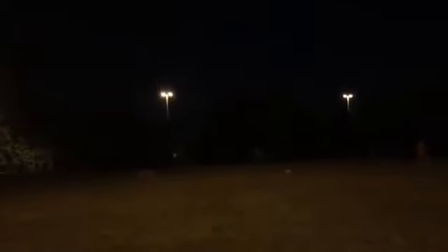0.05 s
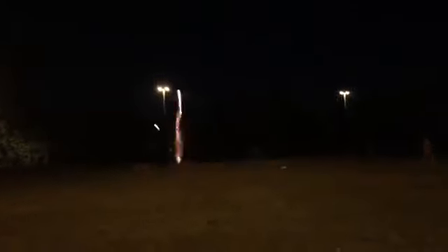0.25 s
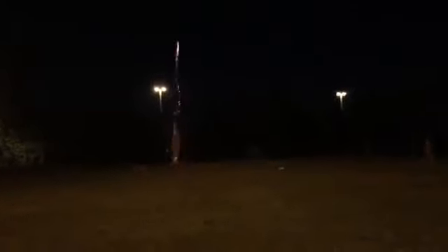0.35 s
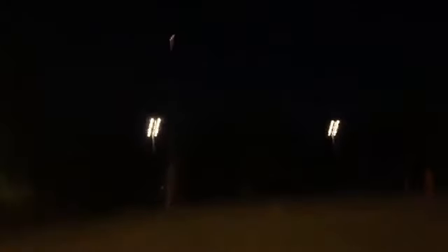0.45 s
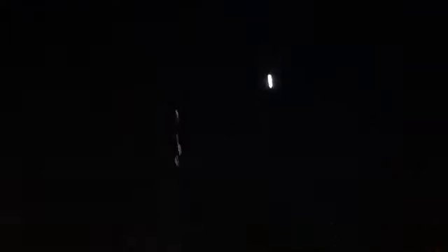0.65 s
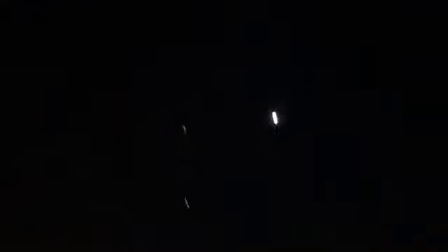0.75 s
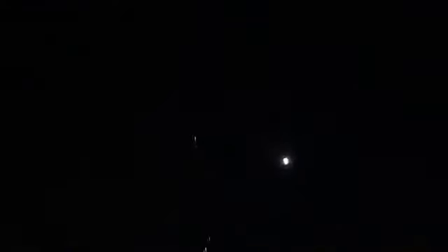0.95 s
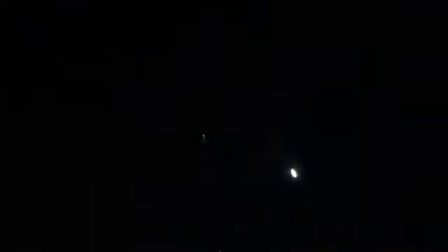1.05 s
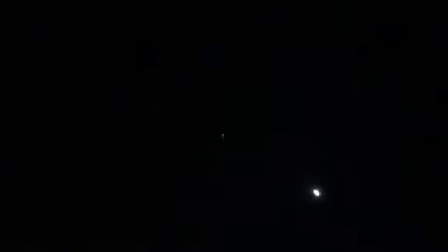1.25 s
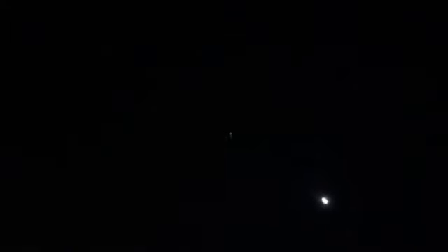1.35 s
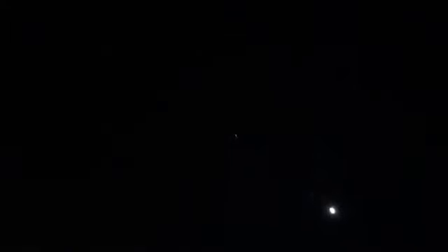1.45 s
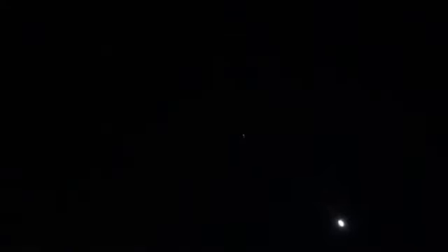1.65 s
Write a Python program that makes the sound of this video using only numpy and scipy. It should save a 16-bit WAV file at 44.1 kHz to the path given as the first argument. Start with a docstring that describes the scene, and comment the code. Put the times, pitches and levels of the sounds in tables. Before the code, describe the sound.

A firework launch in an open night field. Quiet air and faint lamp hum until 0.2 s, then a ragged, sizzling crack with a very loud, fast-falling thump at 0.23 s, a second crack at 0.26 s and brief metallic tube ringing. Low booms, small snaps and hissing tree echoes roll through 0.3-0.6 s, a snap at 0.48 s. Duller distant knocks fade until about 1.2 s; wind gusts rumble on the microphone.

```python
"""A firework shell leaves its tube in an open field at night: ragged cracks of shaped noise
with sizzle, a ringing tube (decaying sines) and a deep thump (a sine that falls in pitch).
Low pulses, a rolling hiss from the trees and dull noise bursts from far walls answer it.
Behind lie wind rumble on the microphone, night air and a thin treble hiss (coloured noise),
and the lamps' faint hum and buzz (a sine and repeated resonant spits)."""
import sys
import numpy as np
from scipy import signal
from scipy.fft import irfft
from scipy.io import wavfile

SR = 44100
rng = np.random.default_rng(int(sys.argv[2]) if len(sys.argv) > 2 else 0)


def digitize_waveform(pressure):
    """Quantize a signal to 16-bit integers and store it at the path in sys.argv[1].

    Rows of a 2-D input are taken as channels; values are limited to [-1, 1].
    """
    field = np.atleast_2d(pressure).T
    bounded = np.clip(field, -1, 1)
    quanta = np.round(bounded * 32767).astype(np.int16)
    wavfile.write(sys.argv[1], SR, quanta)


N = 74970
T = np.arange(N) / SR  # time axis [s]

# Sharp cracks: fuse tick, ignition, launch, second crack, then small snaps:
# (start [s], length [s], level [dB], treble shelf [dB], bass shelf [dB])
CRACKS = [(.183, .001, -54, 16, 0), (0.2136, 0.0025, -30, -9, 5), (0.2174, 0.0039, -11.5, -3.5, -6),
          (0.2225, 0.0024, -8.5, 1, -8), (0.2247, 0.0021, -10, -9, 9), (.2570, 0.0018, -19.5, 6, 18),
          (0.2612, 0.0017, -15, 3.5, 10.5), (0.265, 0.0022, -17, 2, 9.5), (0.291, 0.00099, -24, 5, -12),
          (0.3022, .0015, -21, 1.5, 13), (.4842, 0.0036, -20, 3, 3)]
# Spectrum of the crack gas: (frequency [Hz], level [dB])
CRACK_COLOUR = [(150, -5), (330, -6), (480, -5.5), (850, -18), (1200, 1), (1650, 7), (1950, 1.5),
                (2130, -5), (2400, 6), (3000, 2), (3500, 3), (4150, -1.5), (4600, -10.5), (5100, -1.5),
                (5400, -14), (5950, -5), (7000, -16), (9500, -13.5), (10500, -23), (12000, -15.5),
                (14500, -20.5)]
CRACK_RISE_S, CRACK_FALL_S = 0.00031, 0.001
# Later snaps come from farther off and lose their top: loss at 12 kHz per second after the launch
SNAP_DULLING_DB_PER_S = 42
# Gas sizzling after the two big cracks: (start [s], decay [s], level [dB])
SIZZLES = [(.219, 0.017, -26.5), (.2615, 0.0064, -32.5)]
# Spectrum of the sizzle: (frequency [Hz], level [dB])
SIZZLE_COLOUR = [(800, -17), (3000, 6), (6000, 9), (7500, -7), (12000, 1), (15000, -10)]

# Resonances of the launch tube: (frequency [Hz], level [dB], time to fall 60 dB [s])
TUBE_MODES = [(1555, -12, 0.084), (1900, -28, 0.063), (2396, -7, 0.012), (2544, 8, 0.031),
              (2740, -11, 0.077), (3460, 11.5, 0.022), (3720, -26, .028), (3880, -9, .036),
              (5150, -15, .025), (5980, -3, 0.023)]
# The two big cracks set the tube ringing: (time [s], level [dB])
TUBE_STRIKES = [(0.223, -24), (0.2601, -27.5)]

# Thump of escaping gas: it starts at END + SWEEP Hz and sags to END; the hold counts from its start
THUMP_START_S, THUMP_DB = 0.226, 1.5
THUMP_END_HZ, THUMP_SWEEP_HZ, THUMP_SAG_S = 43.2, 245, 0.00434
THUMP_RISE_S, THUMP_HOLD_S, THUMP_FALL_S = 0.0028, 0.018, 0.01

# Low booms thrown back by the surroundings: (centre time [s], pitch [Hz], width [s], level [dB])
BOOMS = [(0.3103, 122, 0.0048, -17.5), (0.3586, 95, 0.0036, -16), (.382, 116, 0.0043, -21),
         (0.4552, 130, 0.0062, -16.5), (0.4692, 101.4, 0.011, -15), (0.4792, 109, 0.0067, -15),
         (0.4939, 86, 0.0062, -10.5), (0.5081, 61, 0.011, -17.5), (.552, 98, 0.0074, -18.5)]

# Waves of scattered echo from the trees: (arrival [s], rise [s], decay [s], level [dB])
TREES = [(0.274, 0.0073, 0.27, -35.5), (0.322, 0.012, 0.16, -25.5), (0.366, 0.0023, 0.018, -27),
         (0.434, 0.018, 0.17, -25.5), (.62, 0.12, 0.4, -35), (1.08, 0.014, 0.013, -36)]
# Spectrum of the tree echo before air loss: (frequency [Hz], level [dB])
TREE_COLOUR = [(60, -15), (180, 11), (300, -11), (500, -13.5), (850, -10.5), (1200, -4.5), (1600, 4.5),
               (2300, -2.5), (3600, -1.5), (5000, -8), (7000, -14.5), (9000, -14.5), (11000, -20),
               (15000, -20)]
# Air loss at 5 kHz, the power by which it grows with frequency, and the unevenness of the echo
AIR_DB_PER_S_AT_5K, AIR_POWER, TWIG_SPREAD_DB = 13, 1.9, 1.5

# Dull knocks from far walls: (arrival [s], decay [s], level [dB])
WALLS = [(.306, 0.032, -40.5), (0.372, 0.0076, -19.5), (.464, 0.016, -26.5), (.552, 0.0075, -62),
         (.655, 0.039, -50), (.733, 0.022, -35), (.8, 0.084, -34.5), (1.055, 0.058, -43.5),
         (1.13, 0.039, -36.5)]
# Spectrum of the knocks: (frequency [Hz], level [dB])
WALL_COLOUR = [(60, -13), (180, 3), (280, 2), (400, 1), (550, -3), (720, -5.5), (950, -9), (2000, -3.5),
               (8000, -64)]
# Short, dull slaps of echo: (arrival [s], decay [s], level [dB])
SLAPS = [(.327, 0.0034, -25), (.371, 0.0033, -33), (.4355, .003, -25), (.673, 0.012, -34),
         (1.052, 0.0063, -37)]
# Spectrum of the slaps: (frequency [Hz], level [dB])
SLAP_COLOUR = [(500, -16), (1600, -6), (2750, 2), (3700, -0.5), (5000, -19), (12000, -45)]

# Wind rumble on the microphone: (time [s], level [dB])
WIND_LEVEL = [(0, -33), (.2, -32.5), (.62, -44), (.76, -26), (.92, -29.5), (.98, -22.5), (1.1, -31),
              (1.23, -25), (1.32, -37), (1.39, -20), (1.46, -44), (1.7, -31)]
# Spectrum of the wind: (frequency [Hz], level [dB])
WIND_COLOUR = [(10, -20.5), (25, -6), (42, 6), (65, -3), (100, -9.5), (160, -21.5), (400, -49),
               (2000, -103)]

# Lamp hum over time: (time [s], level [dB])
HUM_LEVEL = [(0, -40), (.6, -39), (1.2, -44), (1.45, -36), (1.62, -33.5), (1.7, -37)]
# Resonances of the lamp buzz: (frequency [Hz], width [Hz], level [dB])
BUZZ = [(1806, 83, -63.5), (3000, 140, -71), (3670, 150, -68), (5670, 210, -66)]
HUM_HZ = 120  # the buzz spits at this rate too

# Thin treble hiss: (time [s], level [dB])
TOP_HISS_LEVEL = [(.21, -100), (.23, -46), (.55, -62), (.68, -68), (.88, -60.5), (.905, -100)]
# Spectrum of the treble hiss: (frequency [Hz], level [dB])
TOP_HISS_COLOUR = [(2000, -30), (6000, 6), (15000, -5)]
# Spectrum of the night air: (frequency [Hz], level [dB])
AIR_COLOUR = [(20, 14.5), (150, 4), (280, 5.5), (420, -1), (700, -3), (1050, 1), (1550, 6), (2100, -3),
              (3000, -10.5), (4000, -16.5), (5000, -27.5), (6300, -25), (7500, -32.5), (15000, -36.5),
              (20000, -45)]
NIGHT_AIR_DB = -42.5

CEILING, EDGE_HZ = 1.0, 15100  # peak limit [full scale] and top of the band


def amp(db):
    """Turns decibels into gain."""
    return 10 ** (np.asarray(db) / 20)


def unit(x):
    """Scales a signal to rms 1."""
    return x / np.sqrt(np.mean(x ** 2) + 1e-20)


def read(points, hz):
    """Reads a spectrum in dB on a log-frequency axis."""
    f, db = np.transpose(points)
    return np.interp(np.log(hz + 1), np.log(f + 1), db)


def level(points):
    """Draws gain over time from a level curve."""
    return amp(np.interp(T, *np.transpose(points)))


def noise(colour, treble_db=0, bass_db=0, dull_db=0):
    """Coloured noise of rms 1, with treble and bass shelves and a loss at the very top."""
    hz = np.fft.rfftfreq(N, 1 / SR)
    shelf_gains = [bass_db, 0, 0, treble_db, treble_db - dull_db]
    shelves = np.interp(hz, [600, 1200, 4000, 7500, 12000], shelf_gains)
    phases = np.exp(2j * np.pi * rng.random(len(hz)))
    return unit(irfft(amp(read(colour, hz) + shelves) * phases, N))


def envelope(start, rise, hold, fall):
    """Straight rise, then an exponential fall that begins `hold` seconds after the start."""
    attack = np.clip((T - start) / rise, 0, 1)
    return attack * np.exp(-np.maximum(T - start - hold, 0) / fall)


def puffs(rows, colour, rise):
    """Bursts of coloured noise that rise quickly and die away."""
    return noise(colour) * sum(amp(db) * envelope(s, rise, rise, fall) for s, fall, db in rows)


def cracks():
    """Ragged bursts of gas; the two big ones leave a short sizzle."""
    out = puffs(SIZZLES, SIZZLE_COLOUR, rise=0.006)
    for start, length, db, treble_db, bass_db in CRACKS:
        shape = envelope(start, CRACK_RISE_S, length, CRACK_FALL_S)
        dull_db = SNAP_DULLING_DB_PER_S * max(start - THUMP_START_S, 0)
        gas = noise(CRACK_COLOUR, treble_db, bass_db, dull_db)
        # each burst keeps the energy of its envelope, whatever the noise does inside it
        out += amp(db) * unit(shape * gas) * np.sqrt(np.mean(shape ** 2))
    return out


def tube(rise=0.0014):
    """The launch tube's resonances ring briefly, with a hollow tone."""
    out = np.zeros(N)
    for start, hit_db in TUBE_STRIKES:
        for hz, db, t60 in TUBE_MODES:
            ring = np.sin(2 * np.pi * (hz * T + rng.random()))
            out += amp(hit_db + db) * envelope(start, rise, rise, t60 / np.log(1000)) * ring
    return out


def thump():
    """One heavy pressure swing that slows as the tube empties."""
    t = np.maximum(T - THUMP_START_S, 0)
    sweep_turns = THUMP_SWEEP_HZ * THUMP_SAG_S * (1 - np.exp(-t / THUMP_SAG_S))
    turns = THUMP_END_HZ * t + sweep_turns
    shape = envelope(THUMP_START_S, THUMP_RISE_S, THUMP_HOLD_S, THUMP_FALL_S)
    return -amp(THUMP_DB) * shape * np.sin(2 * np.pi * turns)


def booms():
    """The thump comes back as short, rounded low pulses."""
    out = np.zeros(N)
    for centre, hz, width, db in BOOMS:
        t = T - centre
        out -= amp(db) * np.exp(-(t / width) ** 2) * np.cos(2 * np.pi * hz * t)
    return out


def trees():
    """Dense small reflections arrive in waves, duller the farther they have come."""
    # the strength of the echo is redrawn every 32 samples
    patches = amp(TWIG_SPREAD_DB * rng.standard_normal(N // 32 + 1))
    taps = rng.standard_normal(N) * np.repeat(patches, 32)[:N]
    hz, t, spectrum = signal.stft(unit(taps), SR, nperseg=512)
    colour = unit(amp(read(TREE_COLOUR, hz)))[:, None]
    air_loss_db = AIR_DB_PER_S_AT_5K * (hz[:, None] / 5000) ** AIR_POWER * np.maximum(t - THUMP_START_S, 0)
    hiss = signal.istft(spectrum * colour * amp(-air_loss_db), SR, nperseg=512)[1][:N]
    # the waves add as power
    power = sum((amp(db) * envelope(s, rise, rise, fall)) ** 2 for s, rise, fall, db in TREES)
    return hiss * np.sqrt(power)


def walls():
    """Far walls return the bang as dull noise bursts: knocks and slaps."""
    knocks = puffs(WALLS, WALL_COLOUR, rise=0.0025)
    slaps = puffs(SLAPS, SLAP_COLOUR, rise=0.0014)
    return knocks + slaps


def wind():
    """Gusts rumble on the microphone: low noise that swells and sinks."""
    return level(WIND_LEVEL) * noise(WIND_COLOUR)


def lamps():
    """Mains hum, and a buzz whose harmonics gather in a few resonances."""
    out = np.sqrt(2) * level(HUM_LEVEL) * np.sin(2 * np.pi * HUM_HZ * T)  # level is rms
    t = T[:SR // 50]
    for hz, width, db in BUZZ:
        spit = t * np.exp(-2 * np.pi * width * t) * np.sin(2 * np.pi * hz * t)
        out += amp(db) * unit(np.interp(T % (1 / HUM_HZ), t, spit))  # one spit per hum cycle
    return out


def treble_hiss():
    """A thin treble hiss joins the bang and lingers after it."""
    return level(TOP_HISS_LEVEL) * noise(TOP_HISS_COLOUR)


def night_air():
    """The steady, distant noise of the night."""
    return amp(NIGHT_AIR_DB) * noise(AIR_COLOUR)


def scene():
    """The launch, its echoes and the field."""
    launch = cracks() + tube() + thump()
    echoes = booms() + trees() + walls()
    field = wind() + lamps() + treble_hiss() + night_air()
    return (launch + echoes + field)[None]


def record(dry):
    """The microphone rounds off the highest peaks; then a low-pass limits the band."""
    held = dry / (1 + (dry / CEILING) ** 8) ** (1 / 8)
    lowpass = signal.firwin(255, EDGE_HZ, window=("kaiser", 9), fs=SR)
    return signal.oaconvolve(held, lowpass[None], "same")


dry = scene()
out = record(dry)
digitize_waveform(out)
```